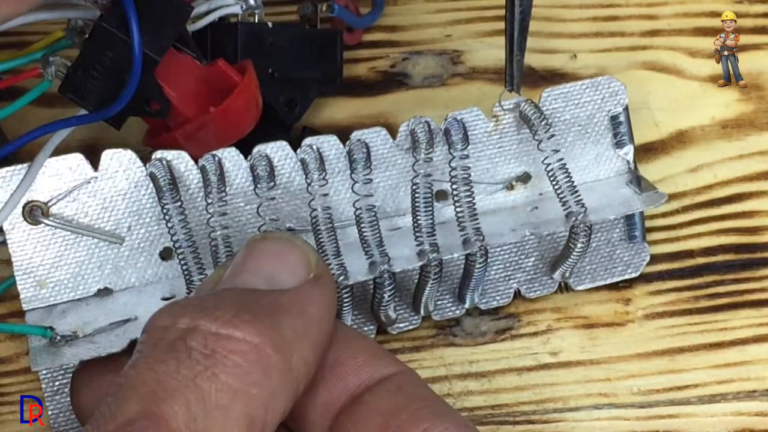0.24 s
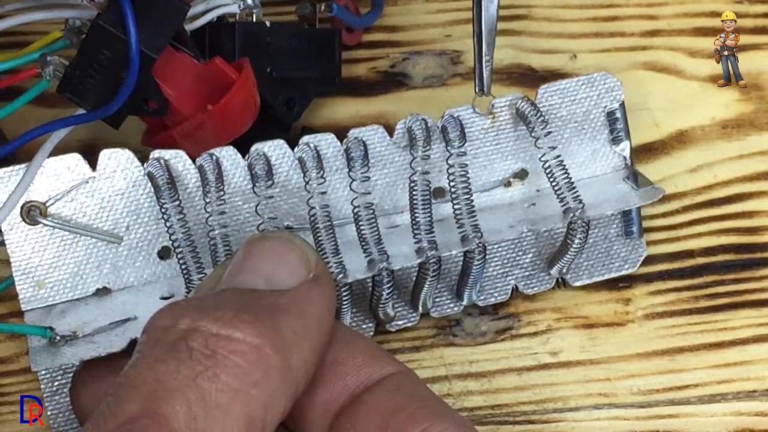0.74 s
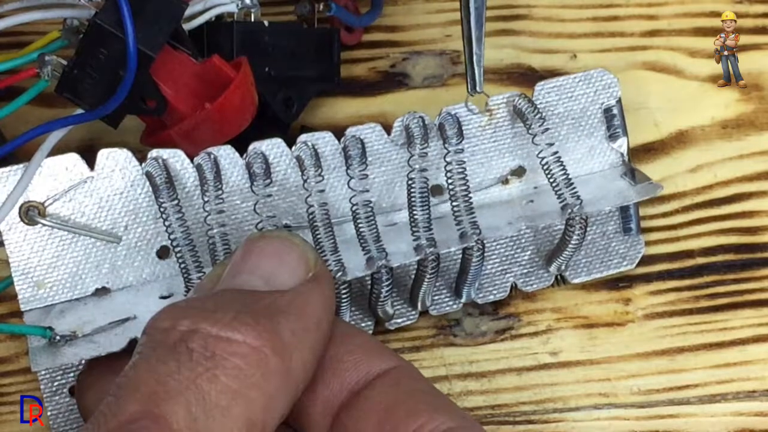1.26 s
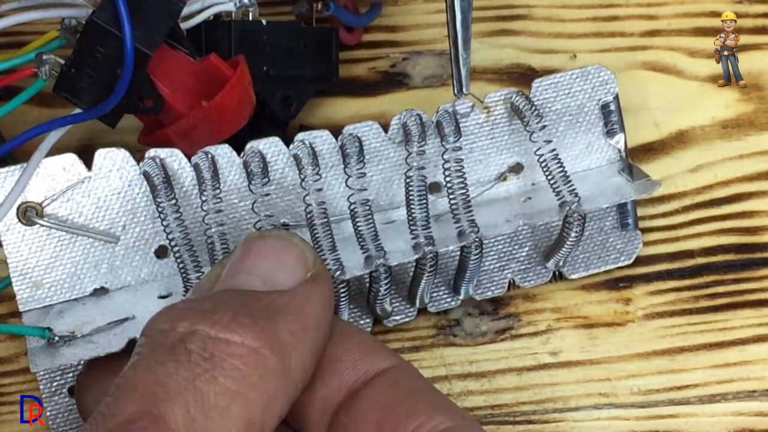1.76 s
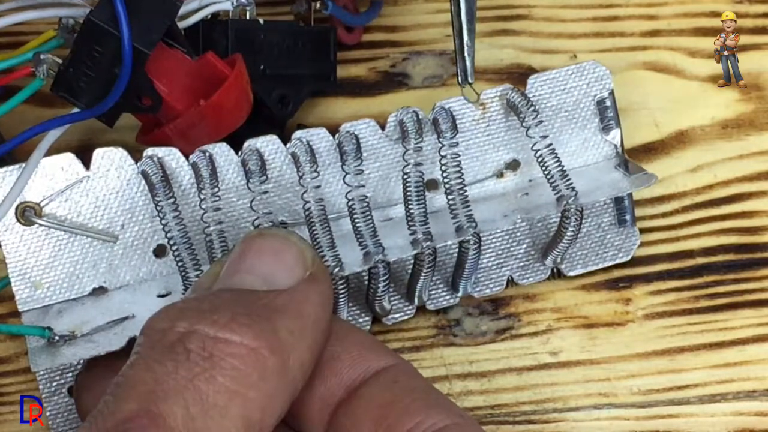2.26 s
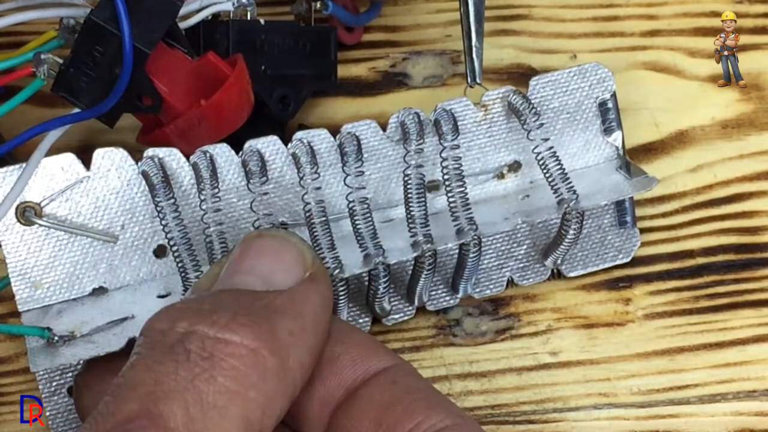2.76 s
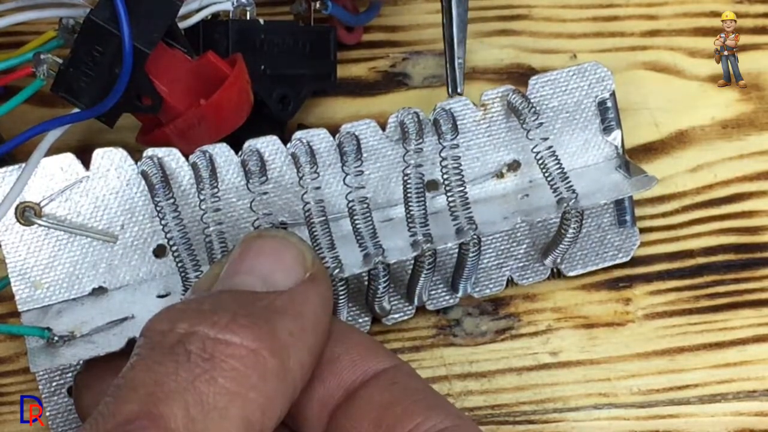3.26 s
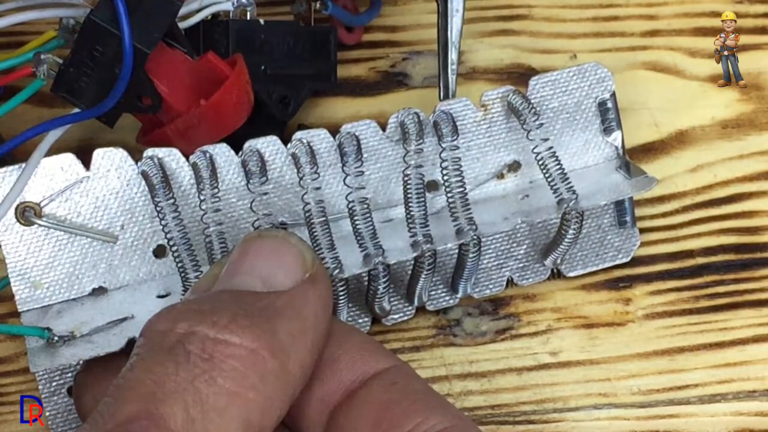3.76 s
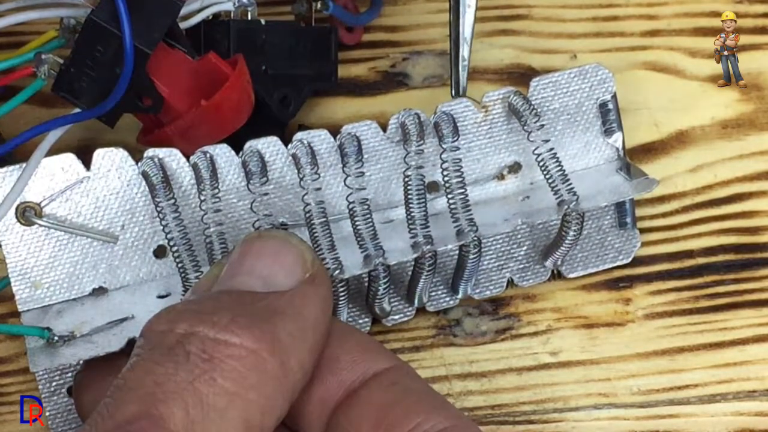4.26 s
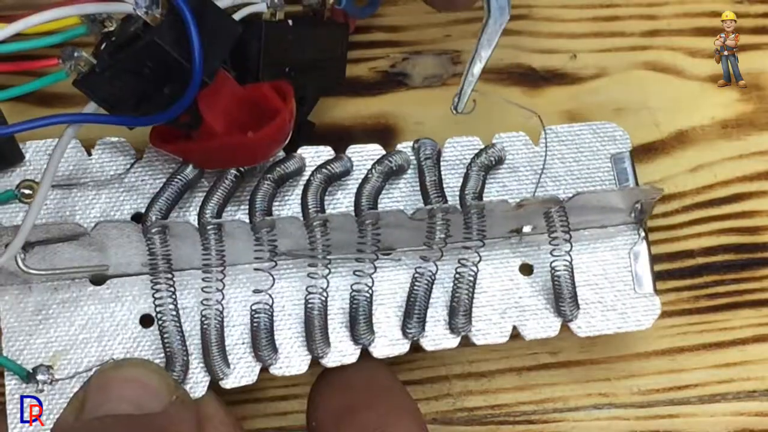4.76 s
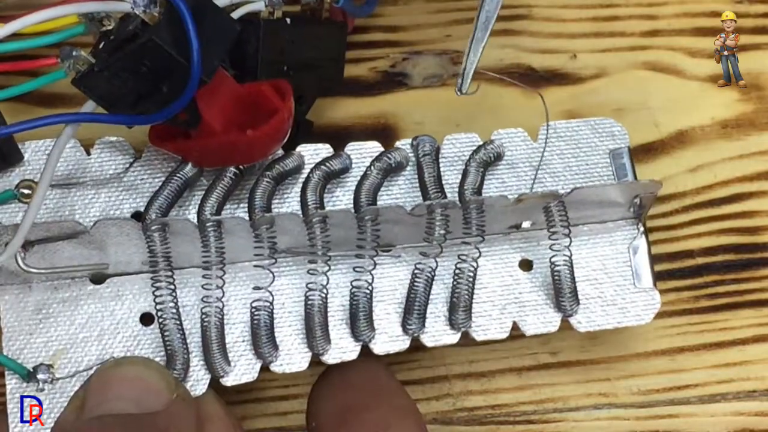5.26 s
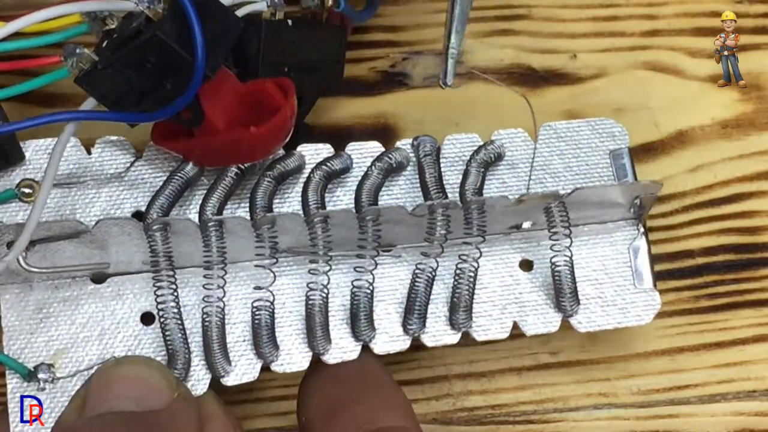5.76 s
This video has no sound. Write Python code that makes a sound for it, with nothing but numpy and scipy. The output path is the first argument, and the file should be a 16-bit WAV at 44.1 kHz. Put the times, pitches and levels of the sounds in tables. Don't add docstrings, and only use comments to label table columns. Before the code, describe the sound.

A quiet small room with faint low hiss and barely audible hum, heard closely by a phone microphone. From 0 s tweezers rub and scrape a thin board holding wire coils; low wooden thumps come around 0.2-0.3 s and a sharp tick at 0.5 s, followed by scratchy rubbing to about 0.9 s. From 1.1 to 1.5 s there are clustered bright clicks with tiny springy rings, then scattered taps and scrapes, ending in a strong metallic snap at 2.38 s. It then stays nearly quiet, with small ticks around 3.5-3.75 and 4.3-4.4 s. An abrupt cut comes at 4.44 s. From 4.57 to 4.85 s the tip zips over coil turns, ratchety and buzzing, its wiry pitch sagging then rising. Short scratches follow at 5.0-5.2 and 5.57 s, another cut at 5.64 s, then hush until the loudest clack at 5.98 s, briefly rattling.

```python
import sys
import numpy as np
from scipy import signal
from scipy.fft import rfft, irfft
from scipy.io import wavfile

SR = 44100
rng = np.random.default_rng(int(sys.argv[2]) if len(sys.argv) > 2 else 0)


def decibels_to_gain(level_db):
    exponent = np.asarray(level_db, float) / 20
    return 10 ** exponent


def generate_wav(signal):
    frames = np.transpose(np.atleast_2d(signal))
    scaled = np.clip(frames, -1, 1) * 32767
    pcm = np.round(scaled).astype(np.int16)
    wavfile.write(sys.argv[1], SR, pcm)


N = 265482

# start_s, silence_s, fade_in_s
SCENE_CHANGES = [(4.435, 0.013, 0.0037), (5.636, 0.0025, 0.014)]


def rms_one(x):
    return x / np.sqrt(np.mean(x ** 2) + 1e-20)


def in_time(rows, outside):
    s, *columns = np.transpose(rows)
    t = np.arange(N) / SR
    return [np.interp(t, s, column, outside, outside) for column in columns]


def resonance(x, hz, width):
    r = np.exp(-np.pi * width / SR)
    gain = (1 - r * r) / 2
    return signal.lfilter([gain, 0, -gain], [1, -2 * r * np.cos(2 * np.pi * hz / SR), r * r], x + 1e-18)


def band(x, low_hz, high_hz):
    return signal.sosfilt(signal.butter(2, [low_hz, high_hz], "band", fs=SR, output="sos"), x)


def grains(per_s, spread_db):
    sizes = decibels_to_gain(spread_db * np.minimum(rng.exponential(1, N), 5)) * rng.standard_normal(N)
    return rms_one(sizes * (rng.random(N) < per_s / SR))


def strokes(rows):
    swing_db = 20
    s, rise, fall, db, extra = np.transpose(rows)[:, :, None]
    late = np.arange(0, N, 32) / SR - s
    distance = np.maximum(late / np.maximum(fall, .001), -late / np.maximum(rise, .001))
    levels = db - swing_db * distance
    loudest = np.interp(np.arange(N) / 32, np.arange(late.shape[1]), levels.max(axis=0))
    return np.maximum(loudest, -150), np.repeat(extra[levels.argmax(axis=0), 0], 32)[:N]


def room_tone():
    # frequency_hz, density_db (per Hz)
    spectrum = [(32, -33), (55, -5), (75, -4.5), (153, -7), (334, -12), (524, -19), (577, -14.5),
                (863, -19.5), (972, -16), (2830, -18.5), (5900, -22.5), (16000, -31)]
    hum_hz, hum_db, hum_late_db = 48.2, -74.5, -82
    hz, points, t = np.fft.rfftfreq(N, 1 / SR) + 1, np.array(spectrum), np.arange(N) / SR
    shape = decibels_to_gain(np.interp(np.log(hz), np.log(points[:, 0]), points[:, 1]))
    air = rms_one(irfft(rfft(rng.standard_normal(N)) * shape, N))
    drift = np.cumsum(rng.standard_normal(N)) * 0.008
    hum = np.sqrt(2) * np.sin(2 * np.pi * hum_hz * t + drift)
    return decibels_to_gain(-70) * air + decibels_to_gain(np.where(t < SCENE_CHANGES[0][0], hum_db, hum_late_db)) * hum


def rubbing_force():
    # loudest_s, rise_s, fall_s, level_db, favoured_hz
    rubs = [(0.0, .01, 0.13, -44.5, 4350), (.16, 0.12, 0.14, -54.5, 2200), (.43, 0.13, 0.14, -59, 5000),
            (.53, .1, 0.3, -47.5, 2290), (.63, 0.34, 0.34, -49.5, 2480), (.95, .3, 0.45, -68.5, 1900),
            (.76, 0.16, 0.15, -48, 2440), (.712, 0.032, 0.12, -43, 2200), (.86, .1, .08, -60, 2600),
            (1.14, .06, .4, -69, 3495), (1.34, 0.24, 0.39, -54, 4180), (1.46, 0.25, 0.13, -55.5, 3430),
            (1.62, .1, .15, -66, 5670), (1.755, 0.023, 0.041, -56, 3400), (1.86, 0.065, 0.28, -53, 3280),
            (1.93, .05, 0.14, -60, 3400), (2.11, 0.058, .2, -49.5, 3600), (2.16, 0.1, 0.16, -51, 3330),
            (2.25, .05, 0.15, -53, 3100), (2.34, 0.042, 0.18, -45.5, 4200), (2.43, .1, 0.11, -52, 3250)]
    # loudest_s, rise_s, fall_s, level_db, favoured_hz
    rattles = [(3.538, .004, 0.2, -58.5, 5500), (3.684, .015, .1, -64, 2600),
               (3.736, .03, .04, -58.5, 2900), (3.76, .02, 0.13, -63, 2900), (4.326, .003, .09, -67, 4500),
               (4.431, 0.067, 0.0021, -43.5, 3740), (4.479, 0.034, 0.044, -51, 4570),
               (5.984, 0.005, 0.029, -27, 2980), (5.992, .005, .6, -34, 4000)]
    rub_low_db, rub_high_db, rattle_low_db, rattle_high_db = -6.5, -11.5, -6, -10.5
    middle, favoured_hz = strokes(rubs + rattles)
    loose = np.arange(N) / SR > rattles[0][0] - .5
    low = middle + np.where(loose, rattle_low_db, rub_low_db) - 6 * np.log2(favoured_hz / 3000)
    high = middle + np.where(loose, rattle_high_db, rub_high_db + .4 * (middle + 52))
    slips = grains(5000, 1.7)
    force = [slips, slips, grains(3600, 1.7)] * decibels_to_gain([low + 4, middle + 3, high + 17])
    return force, np.log(favoured_hz), loose


def impacts():
    # start_s, peak_db, ring_hz, sharpness_db
    ticks = [(0.0044, -35.5, 4620, -15.5), (0.5155, -24.5, 2000, -5), (1.262, -50, 5900, 1),
             (1.2931, -36, 6300, -16), (1.3375, -40, 5630, -13), (1.4366, -30, 4440, -18),
             (1.4532, -31.5, 6000, -15), (1.4691, -26, 3100, -32), (1.6419, -41, 6100, -4),
             (1.7495, -48.5, 3600, -14), (2.206, -40, 1900, -21), (2.381, -20.5, 5200, -36),
             (3.5464, -42.5, 1880, -31), (4.3248, -30, 2840, -15), (4.3804, -29, 4550, -12.5),
             (5.985, -15, 2900, -12.5)]
    # start_s, peak_db, ring_hz, sharpness_db
    taps = [(0.024, -38.5, 4020, -22), (0.364, -49, 6180, -25), (0.489, -46, 4530, 1),
            (0.609, -40.5, 1890, -13), (1.234, -45.5, 4540, -35), (1.2999, -34.5, 7550, -12),
            (1.4106, -36, 3100, -19), (1.4314, -41, 3010, -7), (1.6087, -58, 2570, -27),
            (1.7907, -47, 3360, -14), (1.8193, -32.5, 3240, -29), (1.923, -37.5, 2850, -46),
            (2.1322, -36.5, 3060, -30), (2.2228, -32, 3170, -22), (2.2372, -35, 2730, -39),
            (2.3261, -38, 3300, -44), (2.3762, -29, 1860, -7), (2.7535, -49.5, 5700, -25),
            (3.1195, -54.5, 2840, -32), (3.5345, -42.5, 2000, -18.5), (3.7313, -42, 2880, -23),
            (4.334, -47, 5060, -16), (5.982, -45, 6890, -19)]
    # start_s, peak_db, ring_hz, sharpness_db
    slips = [(0.1063, -38.5, 1490, -22), (0.337, -59, 4400, -7), (0.4982, -40.5, 4170, -8),
             (0.6953, -34.5, 1870, -21), (0.7206, -38, 1850, -16), (0.857, -52, 2870, -36),
             (0.9494, -79, 1660, -4), (1.1063, -46.5, 4830, -23), (1.2761, -41, 2900, -6.5),
             (1.394, -42, 3150, -13), (1.8385, -32, 3630, -31), (2.0954, -49.5, 3100, -24),
             (2.159, -38, 2820, -30), (3.6725, -51, 4460, -24), (3.682, -41, 1930, -20.5)]
    tick_t60_s, tap_t60_s, slip_t60_s = 0.029, 0.049, 0.086
    touches = ticks + taps + slips
    t60 = np.repeat([tick_t60_s, tap_t60_s, slip_t60_s], [len(ticks), len(taps), len(slips)])
    t = np.arange(SR // 5) / SR
    noise = rng.standard_normal((len(touches), len(t)))
    chatter = noise * decibels_to_gain(-60 * t / np.clip(t60, .004, .3)[:, None]) * np.minimum(t / 0.0016, 1)
    return np.transpose(touches), chatter


def board():
    # frequency_hz, width_hz, level_db
    distinct = [(1870, 150, -1), (2480, 47, 9), (2880, 78, 5.5), (3440, 123, -5), (4110, 24, 3),
                (4350, 73, -1.5), (5417, 43, -2), (5392, 103, 0.5), (5820, 75, 2.5), (6050, 104, -4),
                (6910, 140, -13.5)]
    # frequency_hz, width_hz, level_db
    crowded = [(1100, 370, -1.5), (2305, 760, 6), (3830, 3360, -7), (6386, 2600, -7), (8360, 800, -13),
               (9250, 4100, -15), (10540, 3800, -15.5), (14500, 1700, -12)]
    modes = distinct + crowded
    rubs, favoured, loose = rubbing_force()
    (s, peak_db, ring_hz, high_db), chatter = impacts()
    t = np.arange(chatter.shape[1]) / SR
    crack = chatter * decibels_to_gain(-60 * t / 0.48)
    low_db = -15 - 3 * np.log2(ring_hz / 3000)
    luck = rng.standard_normal((len(s), len(modes)))
    wander = 4.5 * rng.standard_normal((len(modes), 400))
    wander_at = np.arange(N) / SR / .04
    loose_and_after = np.append(loose, np.ones(len(t)))
    groups = np.zeros((3, N + len(t)))
    for k, (hz, width, db) in enumerate(modes):
        group = (hz > 2600) + (hz > 6400)
        near_rub_db = np.exp(-((np.log(hz) - favoured) / 0.074) ** 2)
        rub_gain = decibels_to_gain(np.interp(wander_at, np.arange(400), wander[k]) + near_rub_db)
        force = np.append(rubs[group] * rub_gain, 0 * t)
        near_db = 6 * np.exp(-(np.log(hz / ring_hz) / 0.19) ** 2)
        light_db = -14 * max(np.log2(1900 / hz), 0) * (ring_hz > 1600)
        group_db = [low_db + 8, 0, high_db + 21.5][group]
        strength = decibels_to_gain(peak_db + near_db + light_db + group_db + 3.54 * luck[:, k])
        bursts = crack if group == 2 else chatter
        for at, gain, burst in zip((s * SR).astype(int), strength, bursts):
            force[at:at + len(t)] += gain * burst
        if k >= len(distinct) and group < 2:
            force = force * decibels_to_gain(-2.5 * loose_and_after)
        groups[group] += (-1) ** k * decibels_to_gain(db) * resonance(force, hz, max(width, 60))
    out = band(groups[0], 380, 3040) + band(groups[1], 2640, 10900) + band(groups[2], 3500, 11400)
    return out[:N]


def bench():
    # start_s, peak_db, knock_db (relative), panel_db (relative)
    bumps = [(0.152, -47.5, -26, 4.5), (0.166, -54, -24, 7), (0.195, -32.5, -12.5, 1.5),
             (0.249, -30.5, -12.5, 2), (0.294, -48, -15, 3.5), (2.386, -42.5, 1, -1.5),
             (2.16, -57.5, 1, 10), (4.389, -59, 4.5, -6), (4.455, -68, -2, 13)]
    # frequency_hz, level_db, t60_s
    wood_modes = [(116, -14, 0.075), (144.4, 3.5, 0.074), (286, 1, 0.027), (324, -6.5, 0.053),
                  (550, -11.5, 0.039), (972, -11.5, 0.035), (1850, -6.5, 0.014)]
    # time_s, pressure_db
    slide = [(0.0, -76), (0.35, -77.5), (0.53, -61.5), (0.74, -60), (0.87, -66.5), (1.16, -73.5),
             (1.69, -79), (2.04, -70.5), (2.31, -71.5), (2.75, -81.5), (3.3, -84), (4.43, -81),
             (4.58, -67.5), (4.93, -77), (5.21, -82.5), (5.6, -73), (5.77, -87.5), (6.02, -71)]
    out = np.zeros(N)
    for hz, db, t60 in wood_modes:
        clicks, r, w = np.zeros(N), decibels_to_gain(-60 / (t60 * SR)), 2 * np.pi * hz / SR
        for s, peak_db, knock_db, panel_db in bumps:
            delay = 0.26 / hz
            mode_db = knock_db + 13.5 if hz > 500 else panel_db * (hz > 200)
            clicks[round((s + delay) * SR)] = -decibels_to_gain(peak_db - 4 + db + mode_db)
        out += signal.lfilter([0, np.sin(w)], [1, -2 * r * np.cos(w), r * r], clicks + 1e-18)
    pressure_db, = in_time(slide, -150)
    rumble_db = -76 + 0.61 * (pressure_db + 76)
    skin = grains(600, 2.45)
    panel = resonance(skin, 343, 110) + 0.46 * resonance(skin, 306, 113) + 0.16 * resonance(skin, 474, 230)
    rumble = rms_one(band(grains(330, 1.5), 70, 160))
    return out + decibels_to_gain(pressure_db + 1) * rms_one(panel) + decibels_to_gain(rumble_db - 2.5) * rumble


def singing():
    # start_s, length_s, pitch_hz, level_db
    rubbed = [(0.097, 0.034, 1428, -64), (0.505, 0.099, 1980, -58), (1.101, 0.03, 4350, -65),
              (1.1, 0.04, 4400, -77), (1.4, 0.038, 1432, -64), (1.278, 0.028, 1915, -61.5),
              (1.466, 0.026, 1910, -66), (1.602, 0.042, 4260, -79), (3.534, 0.039, 6050, -65),
              (3.526, 0.025, 4260, -72), (3.67, 0.014, 4450, -65), (3.682, 0.038, 2350, -65),
              (5.14, .05, 2350, -71.5), (5.583, 0.046, 2350, -71), (5.992, 0.019, 2370, -56),
              (.01, 0.15, 5540, -62), (0.335, 0.057, 6040, -67), (0.331, 0.077, 4200, -68),
              (0.431, 0.14, 6200, -63), (0.476, 0.066, 4240, -55.5), (.695, 0.027, 1870, -52.5),
              (1.113, 0.012, 2720, -63), (1.61, 0.043, 2630, -74), (3.528, 0.12, 1946, -67.5),
              (3.682, 0.026, 1870, -57), (3.728, 0.035, 2880, -60.5), (3.806, 0.022, 2880, -70.5),
              (5.983, 0.026, 1100, -48), (6.3, 0.039, 5100, -72), (5.99, 0.099, 6150, -46)]
    # start_s, length_s, pitch_hz, level_db
    struck = [(1.107, .03, 5550, -65), (1.1, .02, 1900, -68.5), (1.278, .02, 3000, -59.5),
              (1.468, .015, 3000, -57), (1.85, 0.028, 5250, -58.5), (.02, .03, 2600, -60.5),
              (.005, .05, 4230, -59.5), (.35, .05, 2100, -72.5), (3.536, 0.013, 2000, -58.5),
              (4.325, .02, 2140, -59), (4.327, .03, 5540, -62), (4.326, .02, 2850, -59),
              (4.383, .012, 2900, -57), (3.54, .05, 2900, -69), (3.681, .015, 1870, -57),
              (3.731, .015, 2900, -59), (5.17, .1, 5500, -70), (5.58, .03, 8800, -70),
              (3.6, .06, 1950, -68), (3.69, .04, 3500, -66), (5.985, .02, 800, -58), (4.48, .03, 1020, -71),
              (2.325, .05, 3600, -58), (2.33, .05, 5700, -57), (2.358, .02, 6900, -63),
              (1.82, .015, 3000, -54.5), (2.385, .02, 3050, -46), (1.84, 0.037, 1880, -58),
              (1.47, .03, 2350, -58), (.86, .04, 1000, -72), (2.226, .03, 3050, -55),
              (.858, .03, 3400, -65), (4.41, 0.0237, 3500, -60.5), (2.13, 0.056, 1400, -66)]
    out, drive = np.zeros(N + SR), np.tile(grains(3000, 1.8), 2)
    for k, (start, length, hz, db) in enumerate(rubbed + struck):
        at = int(start * SR)
        t = np.arange(int((length + 0.037) * SR)) / SR
        contact = decibels_to_gain(-12 * t / length) * (t < length) * np.minimum(t / 0.0028, 1)
        first_touch = 14.0 * (t == 0) * (k >= len(rubbed))
        force = drive[at:][:len(t)] * contact + first_touch
        tone = resonance(force, hz, 68 * (hz / 2000) ** 1.1)
        out[at:][:len(t)] += decibels_to_gain(db) * rms_one(resonance(tone, hz, hz / 2.0))
    return out[:N]


def snaps():
    # start_s, peak_db, centre_hz, t60_s
    contacts = [(.515, -37, 9000, .015), (.6125, -43, 7000, .015), (.95, -58, 9000, .012),
                (1.263, -46, 8000, .015), (1.278, -41, 8500, .012), (1.296, -37, 8000, .01),
                (1.302, -33.5, 7450, 0.013), (1.379, -48, 4000, .015), (1.412, -41, 5000, .012),
                (1.432, -44, 7000, .01), (1.4372, -33, 6400, 0.011), (1.452, -43, 10000, 0.013),
                (1.6432, -39, 6500, .015), (1.792, -45, 3600, .012), (2.103, -53, 7000, 0.011),
                (2.112, -50, 5000, .012), (2.134, -40, 5500, 0.014), (2.162, -43, 6000, 0.01),
                (2.171, -48, 7000, .015), (2.207, -47, 8000, .015), (2.225, -40, 7400, 0.021),
                (2.379, -40, 1470, 0.026), (2.3835, -25, 5700, 0.022), (2.386, -25, 3270, 0.021),
                (2.386, -32.5, 9000, 0.022), (3.526, -56, 3300, .015), (3.673, -46, 4300, .015),
                (4.326, -37, 6000, .015), (4.333, -42, 5500, .012), (4.382, -36.5, 7000, .015),
                (5.9886, -18, 2880, 0.019), (5.986, -27, 8500, .015), (5.987, -31, 12000, .03),
                (4.382, -44, 14500, .015), (2.134, -46, 14000, .03)]
    out, t = np.zeros(N + SR), np.arange(SR // 20) / SR
    noises = rng.standard_normal((len(contacts), len(t)))
    for (s, peak_db, hz, t60), noise in zip(contacts, noises):
        decay = noise * decibels_to_gain(-60 * t / max(t60, .003))
        burst = resonance(resonance(decay, hz, hz / 2.54), hz, hz / 2.2)
        out[round(s * SR):][:len(t)] += decibels_to_gain(peak_db) * burst / np.abs(burst).max()
    return out[:N]


def turns():
    # start_s, peak_db
    catches = [(4.48, -37.5), (4.572, -35), (4.5764, -39), (4.594, -38), (4.5976, -37), (4.6074, -39),
               (4.6192, -40), (4.634, -38), (4.6384, -38), (4.643, -37), (4.6498, -30.5), (4.6717, -29.5),
               (4.6844, -38), (4.6987, -36), (4.7024, -43), (4.7064, -39), (4.7126, -35), (4.7174, -35),
               (4.7224, -36), (4.7318, -35.5), (4.7386, -33), (4.7581, -34), (4.7647, -38), (4.7744, -38),
               (4.7804, -36), (4.7854, -36), (4.7996, -38), (4.8124, -38.5), (4.8304, -43), (4.8619, -44),
               (5.009, -43), (5.0204, -44.5), (5.1176, -43), (5.1454, -45), (5.1537, -35.5),
               (5.1603, -34.5), (5.1684, -38), (5.574, -45)]
    run_start_s, run_end_s, turn_s = 4.577, 4.835, 0.0088
    s = np.arange(run_start_s, run_end_s, turn_s)
    luck = rng.standard_normal((80, 2))[:len(s)]
    drops = list(zip(s + .3 * turn_s * luck[:, 0], -48 + luck[:, 1]))
    return [(s, db, max(-9.5 - 52 * max(s - run_start_s, 0), -37)) for s, db in catches + drops]


def coil_drag():
    # frequency_hz, width_hz, level_db
    coil_modes = [(1100, 390, -10), (2350, 750, -8), (3330, 650, -5.5), (5500, 710, -2), (6000, 840, -10),
                  (7570, 620, -12), (8850, 360, -6.5), (11500, 360, -13.5), (13900, 740, -18),
                  (15000, 1200, -23), (4720, 1400, -9)]
    # time_s, pitch_hz, level_db
    free_wire = [(4.57, 4970, 1), (4.6, 4600, 2.5), (4.65, 4220, 8), (4.68, 4130, 11), (4.72, 3790, 14.5),
                 (4.75, 4570, 3), (4.78, 4930, 1), (4.81, 5200, -10)]
    # loudest_s, rise_s, fall_s, level_db, low_modes_db (relative)
    drags = [(4.455, .01, .14, -61, 6), (5.03, .01, .02, -53, -10), (4.572, 0.016, 0.084, -42.5, -12),
             (4.64, .2, 0.38, -49.5, -8.5), (4.724, 0.19, 0.2, -47, -3.5), (4.84, 0.28, 0.029, -52, -2.5),
             (5.012, 0.029, 0.025, -46.5, -12), (5.085, .02, .08, -59, -20), (5.164, .2, 0.06, -47, -14),
             (5.25, .05, .1, -71, -2), (5.575, .005, 0.1, -56, 0.5), (5.56, 0.17, .02, -64.5, 2.5)]
    t, slips = np.arange(SR // 40) / SR, grains(5000, 0.97)
    rub_db, low_db = strokes(drags)
    drops = turns()
    bursts = rng.standard_normal((len(drops), len(t))) * decibels_to_gain(-60 * t / 0.009) * np.minimum(t / 0.00075, 1)
    bursts /= np.abs(bursts).max(axis=1, keepdims=True)
    luck = rng.standard_normal((len(drops), len(coil_modes) + 1))

    def force(k, hz):
        out = slips * decibels_to_gain(rub_db - 1 + (low_db + 16.5) * (hz < 3000))
        for (s, peak_db, top_db), burst, own in zip(drops, bursts, luck[:, k]):
            mode_db = (top_db + 13.5) * (hz > 10000) - 7.3 * (hz < 3000)
            out[round(s * SR):][:len(t)] += decibels_to_gain(peak_db + 14.5 + mode_db + 1.6 * own) * burst
        return out

    out = np.zeros(N)
    for k, (hz, width, db) in enumerate(coil_modes):
        out += decibels_to_gain(db) * resonance(resonance(force(k, hz), hz, 1.38 * width), hz, width)
    wire_hz, wire_db = in_time(free_wire, -150)
    turning = np.exp(2j * np.pi * np.cumsum(wire_hz) / SR)
    r = np.exp(-np.pi * 400 / SR)
    slow = signal.lfilter([1 - r], [1, -r], force(-1, 4000) * decibels_to_gain(wire_db - 6) / turning)
    return out + 2 * np.real(signal.lfilter([1 - r ** 3], [1, -r ** 3], slow) * turning)


def room(x):
    t60_s, tail_db = 0.2, -9
    t = np.arange(SR // 2) / SR
    tail = band(rng.standard_normal(len(t)), 227, 6370) * decibels_to_gain(-60 * t / t60_s) * (t > .004)
    return decibels_to_gain(tail_db) * signal.fftconvolve(x, tail / np.sqrt(np.sum(tail ** 2)))[:N]


def scene():
    air = room_tone()
    near = board() + bench() + singing() + snaps() + coil_drag()
    shots = np.split(near, [int(s * SR) for s, silence, fade in SCENE_CHANGES])
    tails = np.concatenate([room(shot)[:len(shot)] for shot in shots])
    return (near + tails + air)[None]


def band_limit(x):
    return signal.sosfilt(signal.butter(12, 15900, fs=SR, output="sos"), x)


def record(dry):
    t, gain = np.arange(N) / SR, np.ones(N)
    for s, silence, fade in SCENE_CHANGES:
        gain = gain * np.where(t < s, 1, np.clip((t - s - silence) / fade, .03, 1))
    heard = signal.sosfilt(signal.butter(4, [45, 18500], "band", fs=SR, output="sos"), dry)
    return band_limit(heard * gain)


dry = scene()
out = record(dry)
generate_wav(out)
```